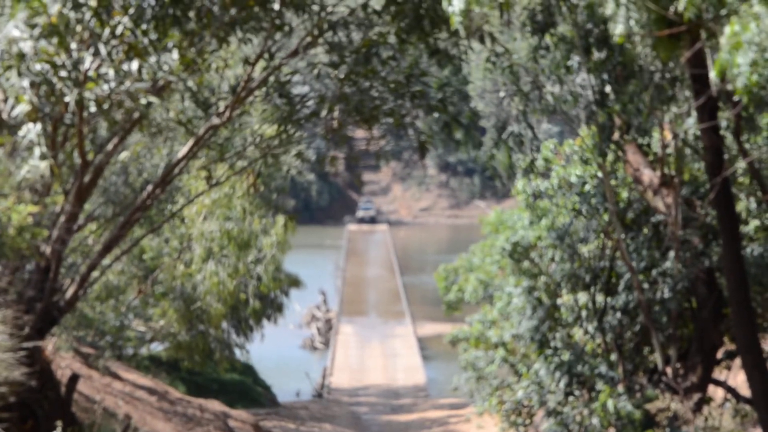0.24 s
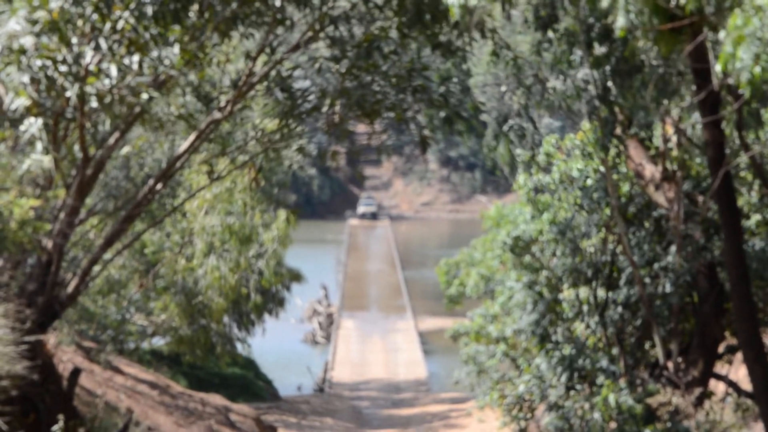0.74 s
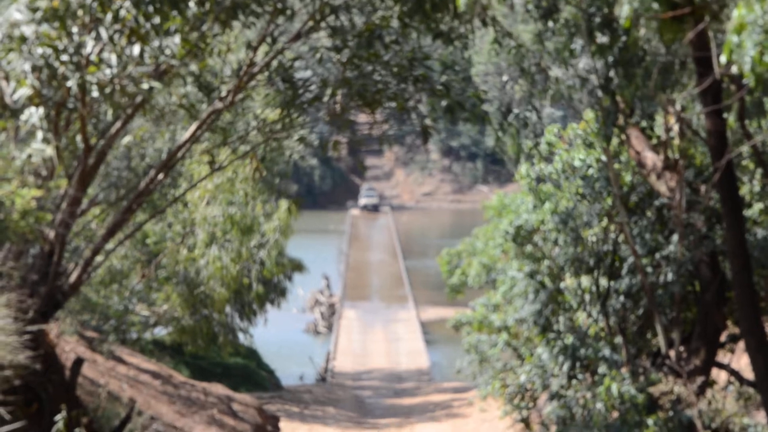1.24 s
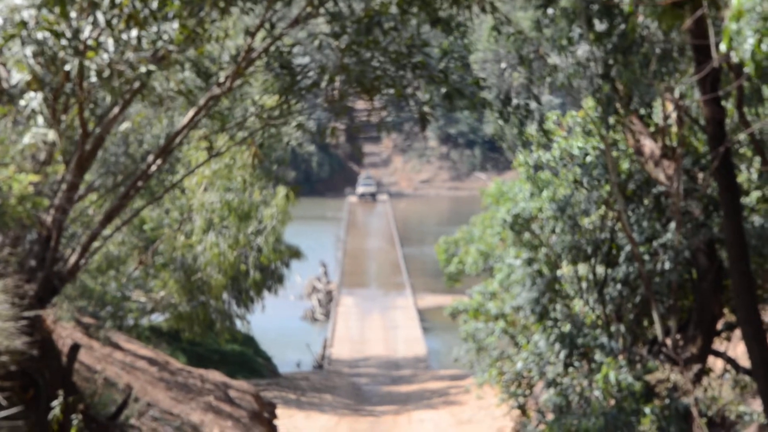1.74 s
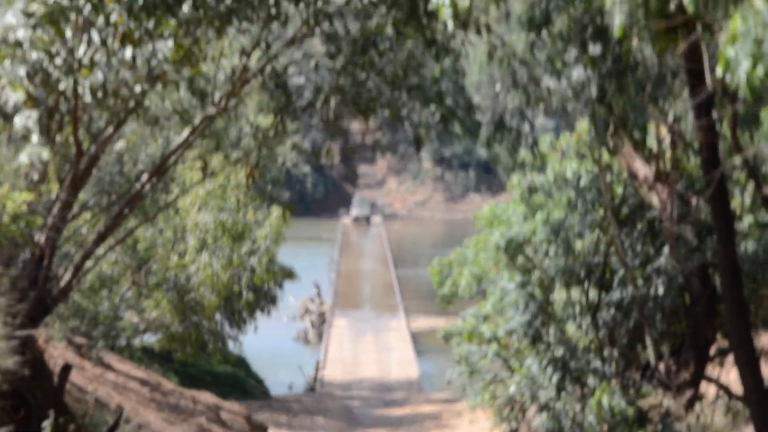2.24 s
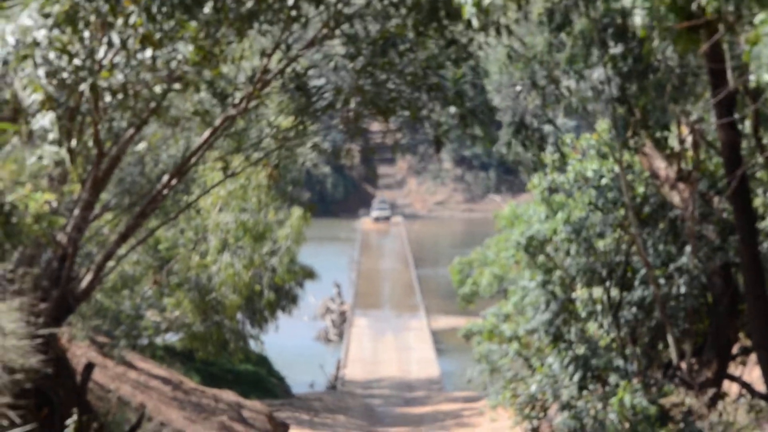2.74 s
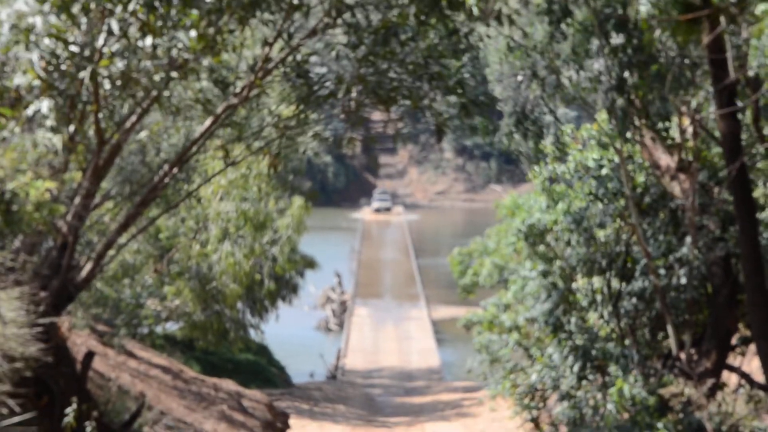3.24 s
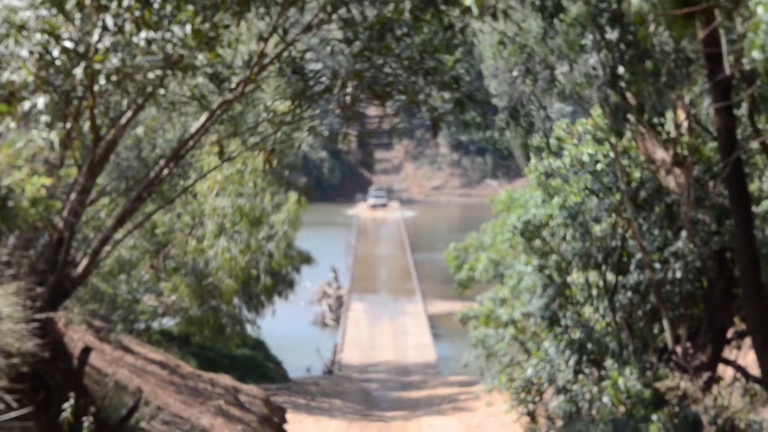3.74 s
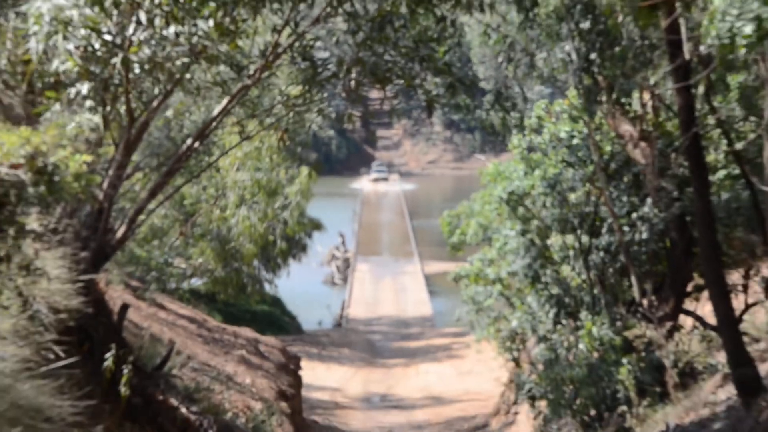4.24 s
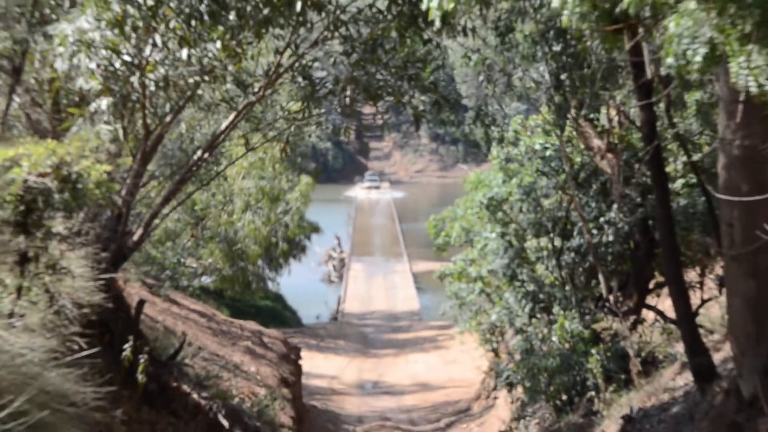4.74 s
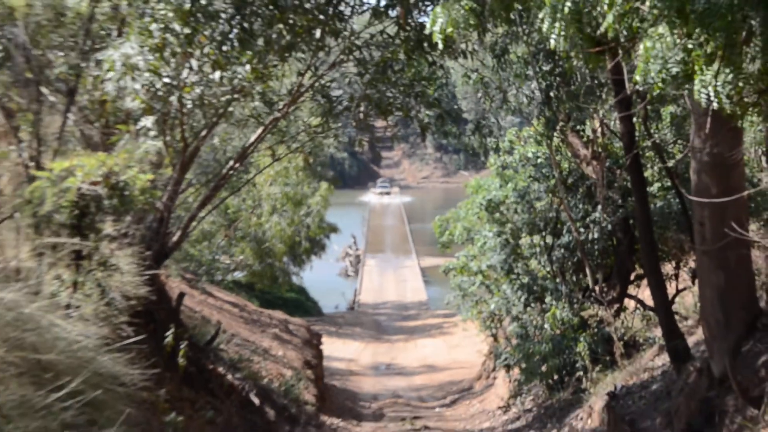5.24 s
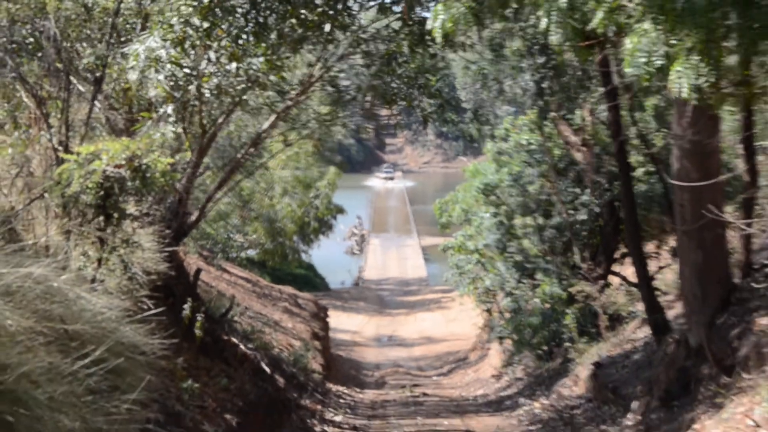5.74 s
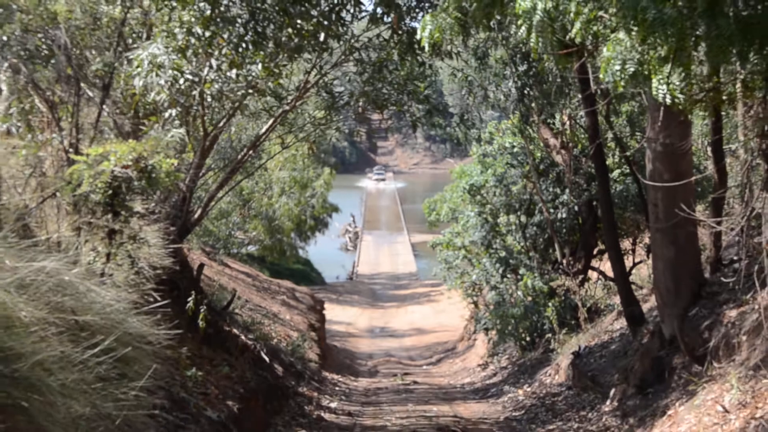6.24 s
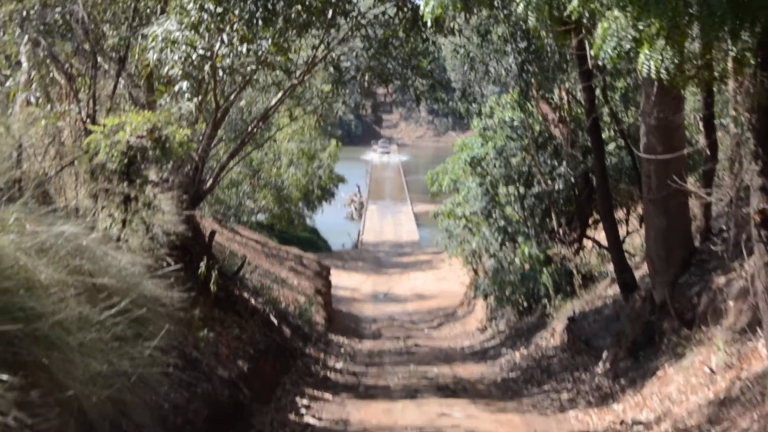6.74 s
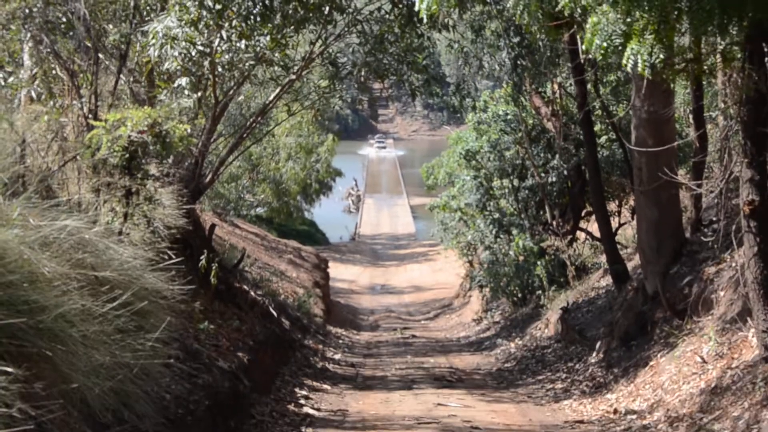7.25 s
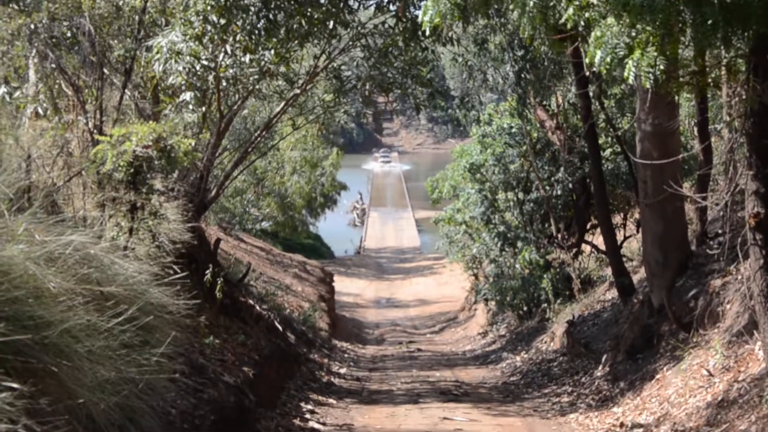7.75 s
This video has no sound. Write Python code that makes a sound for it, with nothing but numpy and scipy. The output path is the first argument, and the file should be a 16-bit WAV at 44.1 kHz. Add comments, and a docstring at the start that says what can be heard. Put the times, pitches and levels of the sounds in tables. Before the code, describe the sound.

From a wooded bank, a diesel four-wheel-drive is heard across a river, its low uneven chug rising only slightly in speed. Steady river, leaf and far insect noise surrounds it, with a barely audible very high electronic whine. During 0-3 s birds are busy: clear arched whistles near 0, 1.2, 1.5-1.7 and 2.7 s, amid short chips and faint chatter, echoing among trunks. At about 1.6 s the engine takes up drive, and from 2-2.8 s it labours with a slight surge. Spray builds from about 2.4 s, thickening into a full watery rush by 4.7 s, strongest around 6-7 s, then easing a little. More whistles come at 3.2 and 4.2-4.3 s, then only sparse faint chirps. Soft low wind buffets hit at 3.1, 3.7, 4.4 and 4.7 s. A sharp dry tick snaps close at 4.9 s, followed by tinier ones until 6.2 s. Engine and spray continue to the end at 8 s.

```python
"""A diesel four-wheel-drive rolls into a far river ford, heard from a wooded bank.
Its exhaust is a stack of low tones tied to the engine speed; spray is shaped noise that swells.
Steady noise makes the river, leaves and far insects; slow lumpy noise makes light wind on the microphone.
A thin electronic whine sits at the top. Birds whistle gliding tones that echo among the trees,
and small dry ticks, short bursts of bright noise, snap close by."""
import sys
import numpy as np
from scipy import signal
from scipy.io import wavfile
from scipy.ndimage import uniform_filter1d

SR = 44100
rng = np.random.default_rng(int(sys.argv[2]) if len(sys.argv) > 2 else 0)


def pcm_store(signal):
    """Save signal as 16-bit PCM."""
    levels = np.round(np.clip(np.atleast_2d(signal), -1, 1) * 32767)
    wavfile.write(sys.argv[1], SR, levels.astype(np.int16).T)


N = 352359
TIME = np.arange(N) / SR


def amp(db):
    """Turns decibels into a gain."""
    return 10 ** (np.asarray(db) / 20)


def evened(x):
    """Scales a signal to an rms (average strength) of 1."""
    return x / np.sqrt(np.mean(x ** 2) + 1e-20)


def curves(rows):
    """Draws each column of a table as a line over time, sample by sample."""
    s, *columns = np.transpose(rows)
    return [np.interp(TIME, s, column) for column in columns]


def drift(seconds, n=N):
    """Random wandering of rms 1: noise averaged twice over the given time."""
    size = max(int(seconds * SR), 2)
    once = uniform_filter1d(rng.standard_normal(n), size)
    return evened(uniform_filter1d(once, size))


def filtered(x, order, hz, kind="low"):
    """Keeps only the pitches below one frequency, or inside a band."""
    return signal.sosfilt(signal.butter(order, hz, kind, fs=SR, output="sos"), x)


def resonate(x, hz, width):
    """Shifts hz down to zero, smooths, and shifts back: a resonance of gain 1."""
    turn = np.exp(2j * np.pi * np.cumsum(hz * np.ones(len(x))) / SR)
    r = np.exp(-np.pi * width / SR)
    smooth = signal.lfilter([1 - r], [1, -r], x / turn)
    return 2 * (turn * smooth).real


def hiss(colour, patchy_db, flicker_db):
    """Noise of rms 1 from random short spectra, with drifting patches and a flicker shared by all pitches."""
    frames, hz = N // 256 + 5, np.fft.rfftfreq(1024, 1 / SR)
    a, b, patches = rng.standard_normal((frames, 513, 3)).T
    patches = uniform_filter1d(patches, 14, 0)  # neighbouring pitches
    patches = evened(uniform_filter1d(patches, 10, 1))  # neighbouring moments
    flicker = evened(uniform_filter1d(rng.standard_normal(frames), 4))
    f, db = np.transpose(colour)
    shape_db = np.interp(np.log(hz + 1), np.log(f + 1), db, left=-120, right=-120)[:, None]
    spectra = (a + 1j * b) * amp(shape_db + patchy_db * patches + flicker_db * flicker)
    return evened(signal.istft(spectra, nperseg=1024, noverlap=768)[1][:N])


# The driver presses on as the wheels meet the water; under load the governor makes the speed hunt.
LOAD_FROM_S, LOAD_FULL_S, LOAD_BEND = 1.97, 2.8, 1.5  # bend: power of the rise
HUNT_PER_S, HUNT_S, HUNT_PEAK_S = .054, .697, 3.415  # swing [cycles per s], period, a peak
BEAT_PLACE = .234  # where the count of cycles begins [cycles]
# Engine speed before hunting, one cycle being two crank turns: (time [s], speed [cycles per s])
ENGINE_SPEED = [(0, 9.6), (.25, 10.0), (.65, 10.329), (1.1, 10.085), (1.6, 10.365), (1.95, 10.477),
                (2.3, 10.855), (2.65, 10.877), (3, 11.221), (3.3, 11.275), (4.6, 11.246), (6, 11.112),
                (7.99, 11.113)]


def crank():
    """Load from 0 to 1, and engine cycles turned so far: the running sum of the speed."""
    load = np.clip((TIME - LOAD_FROM_S) / (LOAD_FULL_S - LOAD_FROM_S), 0, 1) ** LOAD_BEND
    hunt = HUNT_PER_S * load * np.cos(2 * np.pi * (TIME - HUNT_PEAK_S) / HUNT_S)
    cycles = np.cumsum(curves(ENGINE_SPEED)[0] + hunt) / SR - BEAT_PLACE
    return load, cycles


DRIVE_FROM_S, DRIVE_RISE_S = 1.617, 0.093  # the engine takes up drive at the foot of the bank
COAST_DB, PULL_DB = 0.75, -1  # added to the tones off load and on full load
APPROACH_DB_PER_S = 0.628  # growth on the way across
PIPE_SPREAD, PIPE_TURN = -.00095, .277  # how the pipe smears the tones [cycles]
# Exhaust tones, levels before the changes above: (multiple of the cycle rate,
# coasting down the bank [dB], taking up drive [dB], pulling in the water [dB])
EXHAUST_TONES = [(7, -83, -77, -70), (8, -66, -64, -65), (9, -78, -79, -72), (10, -80, -75, -77),
                 (11, -65, -65, -59), (12, -78, -76, -69), (13, -60, -58, -61), (14, -72, -72, -73),
                 (15, -77, -77, -70), (16, -69, -62, -55), (17, -67, -62, -57), (18, -67, -65, -75),
                 (19, -66, -66, -68), (20, -69, -66, -67), (21, -75, -72, -58), (22, -74, -66, -61),
                 (23, -66, -64, -67), (24, -65, -61, -68), (25, -72, -75, -74), (26, -85, -82, -72),
                 (27, -77, -78, -76), (28, -66, -61, -73), (29, -72, -73, -83), (30, -67, -72, -72),
                 (31, -78, -69, -67)]
# Five uneven firings, which set how the tones line up:
# (place [cycles], strength coasting, strength taking up drive, strength pulling)
FIRINGS = [(-.054, .51, .53, .55), (.123, .28, .31, .37), (.391, .36, .41, .43), (.555, .22, .17, .33),
           (.7, .64, .61, .4)]


def exhaust(waver=.15):
    """Uneven firing repeats every cycle: tones that meet at the firings, smeared by the pipe."""
    load, cycles = crank()
    drive = np.clip((TIME - DRIVE_FROM_S) / DRIVE_RISE_S, 0, 1)
    stage = np.array([1 - drive, drive * (1 - load), drive * load])  # coasting, taking up, pulling
    near_db = COAST_DB + load * (PULL_DB - COAST_DB)
    near_db = near_db + APPROACH_DB_PER_S * np.maximum(TIME - LOAD_FULL_S, 0)
    place, *strength = np.transpose(FIRINGS)
    knots = np.linspace(0, TIME[-1], 90)
    out = np.zeros(N)
    for k, *db in EXHAUST_TONES:
        wobble, flutter = (np.interp(TIME, knots, row) for row in rng.standard_normal((2, 90)))
        meet = np.array(strength) @ np.exp(-2j * np.pi * k * place)
        direction = meet / abs(meet)  # the firings give timing only; the table gives the level
        size = (amp(db) * direction) @ stage * amp(1.5 * flutter)  # every tone varies in strength
        turn = k * cycles + PIPE_SPREAD * k ** 2 + PIPE_TURN
        out += (size * np.exp(2j * np.pi * turn + 1j * waver * wobble)).real
    return np.sqrt(2) * amp(near_db) * out


THROB_DB, THROB_PLACE = 0.1628, 0.101  # throb once per crank turn: depth, place in the turn
# Spray over time, level before the lifts: (time [s], level [dB], treble lift [dB], bass lift [dB])
SPRAY_LEVEL = [(0, -67, 8, 17), (.9, -60.5, 13.5, 15), (1.65, -67, 9.5, 15.5), (2.43, -56, 3, 11),
               (3.05, -48.5, 1, 1), (4, -46, -1.5, 7.5), (4.7, -41, -6, -0.5), (5.3, -41.5, -3, 0.5),
               (5.65, -42, 0, 1.5), (5.9, -42, 0, 1.5), (6.2, -39, -2.5, -3), (7.03, -38.5, -8, 1.5),
               (7.6, -44, -3, 9), (7.99, -43, -3, 9)]
# Tone colour of the spray, relative: (frequency [Hz], level [dB per Hz])
SPRAY_COLOUR = [(300, -16), (420, -26.5), (650, -7.5), (950, -6.5), (1080, 1), (1400, 4.5), (1500, -3.5),
                (1620, -9), (1780, -13), (1880, -2.5), (2150, -3), (2560, -9), (2700, -24), (2900, -14),
                (3250, -12), (4500, -17.5), (8000, -27.5), (14400, -60.5)]


def spray():
    """Water thrown by the wheels in fine drops; mist brightens it, a deeper bow wave thickens it."""
    level_db, mist_db, churn_db = curves(SPRAY_LEVEL)
    water = hiss(SPRAY_COLOUR, patchy_db=.9, flicker_db=.6)
    water = water * amp(1.3 * drift(.002))
    crank_turns = 2 * crank()[1]
    water = water * amp(THROB_DB * np.cos(2 * np.pi * (crank_turns - THROB_PLACE)))
    churn = filtered(water, 2, 900)
    body = filtered(water, 2, 1700)
    mixed = amp(churn_db) * churn + (body - churn) + amp(mist_db) * (water - body)
    return amp(level_db) * mixed


# Tone colour of river, leaves and far insects together, relative: (frequency [Hz], level [dB per Hz])
BUSH_COLOUR = [(35, -49.5), (60, -18), (125, -8), (255, -8), (310, -6.5), (403, -11), (802, -18.5),
               (1360, -6.5), (1800, -13.5), (2470, -7), (2900, -15.5), (5030, -19.5), (6180, -24),
               (9130, -27), (14400, -48.5)]
# Loudness of that background: (time [s], level [dB])
BUSH_LEVEL = [(0, -50), (1, -51.5), (3, -50.5), (4, -51.5), (7.99, -49.5)]


def bush():
    """River, leaves and far insects blend into one steady, faintly flickering noise."""
    return amp(curves(BUSH_LEVEL)[0]) * hiss(BUSH_COLOUR, patchy_db=0.5, flicker_db=0.94)


WHINE_HZ = 15710
# Whine before its small waver: (time [s], level [dB])
WHINE_LEVEL = [(0, -68.5), (2.58, -69), (2.7, -70.5), (4.56, -71.5), (4.8, -76.5), (5.3, -77.5),
               (5.6, -71.5), (6.3, -75), (7.99, -73)]


def whine():
    """Electronics give a thin tone that wavers a little, with a faint skirt of noise."""
    skirt = resonate(rng.standard_normal(N), WHINE_HZ - 40, 200)
    level_db = curves(WHINE_LEVEL)[0] + .6 * drift(.004)
    tone = np.sqrt(2) * np.sin(2 * np.pi * WHINE_HZ * TIME)
    return amp(level_db) * (tone + amp(-16.5) * skirt)


CALM_DB, CALM_SWING_DB, CALM_SWING_S = -86, 3, .08  # wind between puffs, its random swing and pace
# Puffs of wind, added to the calm: (time of peak [s], peak level [dB], length [s])
GUSTS = [(.33, -74, .15), (.96, -76, .1), (2.9, -72, 0.144), (3.11, -55.5, 0.44), (3.478, -59.5, 0.17),
         (3.659, -49, 0.114), (4.29, -70, .1), (4.44, -57, 0.147), (4.563, -66, .1), (4.686, -50, 0.154),
         (4.86, -67, .1), (5.744, -79.5, 0.46), (6.3, -75.5, .4), (6.96, -69, .15), (7.56, -75.5, .2),
         (7.98, -68.5, .15)]


def wind():
    """Lumpy pressure on the membrane: a restless calm with puffs that swell and die evenly."""
    lumps = drift(0.0019) * amp(7.3 * drift(0.051))
    lumps = filtered(lumps, 3, [30, 75], "band")
    puffs = sum(amp(db) * np.exp(-2 * abs(TIME - s) / length) ** 2 for s, db, length in GUSTS)
    calm = amp(CALM_DB + CALM_SWING_DB * drift(CALM_SWING_S))
    return (calm + puffs) * evened(lumps)


def whistle(hz, size, hoarse):
    """A near sine with faint overtones; hoarseness flutters pitch and strength."""
    turns = np.cumsum(hz * (1 + .025 * hoarse * drift(.002, len(hz)))) / SR
    tone = np.sin(2 * np.pi * turns)
    tone = tone + amp(-42) * np.sin(4 * np.pi * turns) + amp(-25) * np.sin(6 * np.pi * turns)
    return np.sqrt(2) * size * (1 + hoarse * drift(0.000738, len(hz))) * tone


def along(length):
    """Share of a note that has passed, 0 to 1."""
    return np.linspace(0, 1, round(length * SR))


ARCH_FALL = .7  # share of the length at which the pitch starts to drop
ARCH_RISE_BEND, ARCH_FALL_BEND = 1.4, 1.3  # powers
# Long arched whistles of a near bird, levels before swell and trees: (time [s], length [s],
# start [Hz], top [Hz], end [Hz], share of length spent climbing, level [dB])
ARCHES = [(0.018, 0.0759, 1561, 2590, 1882, 0.59, -39), (1.155, 0.1228, 1764, 3061, 1761, 0.477, -36),
          (1.47, 0.0476, 2253, 2626, 2046, 0.58, -40.5), (1.639, 0.1014, 1498, 2635, 1647, 0.576, -38.5),
          (1.657, 0.079, 2322, 3075, 2387, 0.49, -41.5), (2.665, .13, 1735, 3003, 1714, .45, -36.5),
          (3.203, 0.0968, 1766, 2790, 1800, 0.683, -38.5), (4.308, 0.1174, 1776, 2977, 1629, 0.498, -37)]
# Breath swell over each arch: rises to a plateau, peaks near the end of the climb, then fades: (share of
# length, level change [dB])
ARCH_SWELL = [(0, -9), (.28, -3), (.45, -3), (.7, -1.6), (.85, -6), (1, -11)]


def add_arches(out, hoarse=.2):
    """A near bird's pitch climbs, holds and drops while its breath swells and fades."""
    for s, length, start_hz, top_hz, end_hz, top, db in ARCHES:
        u = along(length)
        climb = np.maximum(1 - u / top, 0) ** ARCH_RISE_BEND
        drop = (np.maximum(u - ARCH_FALL, 0) / (1 - ARCH_FALL)) ** ARCH_FALL_BEND
        hz = top_hz - (top_hz - start_hz) * climb - (top_hz - end_hz) * drop
        hz = uniform_filter1d(hz, 300, mode="nearest")  # rounds the corners
        swell_db = np.interp(u, *np.transpose(ARCH_SWELL))
        size = amp(db + swell_db) * signal.windows.tukey(len(u), .12)
        out[round(s * SR):][:len(u)] += whistle(hz, size, hoarse)


CHATTER_DB, CHATTER_UNTIL_S = -57.5, 4.6  # loudest level before the trees, end of the starts


def chatter(count=260):
    """Faint, steep strokes of farther birds at random moments, thinning out."""
    s, length, pitch, slope, soft = rng.random((count, 5)).T
    mid_hz = 1300 * 3.3 ** (pitch ** 1.5)
    step = .5 * (slope - .65)  # above zero the stroke rises, below it falls
    level_db = CHATTER_DB - 6 * soft - 4 * pitch
    return np.transpose([s ** 1.8 * CHATTER_UNTIL_S, 0.007785 + 0.01977 * length,
                         mid_hz * (1 - step), mid_hz * (1 + step), level_db])


RISE_BEND, HOOK_PER_S = 1.1, 18  # powers: over 1 lingers near the low end


def slide(length, start_hz, end_hz):
    """Pitch of a slide: rises run nearly straight, long falls hook into a level end."""
    u = along(length)
    height = u ** RISE_BEND if end_hz > start_hz else (1 - u) ** max(HOOK_PER_S * length + .5, 1)
    return min(start_hz, end_hz) + abs(end_hz - start_hz) * height


CHIP_DROP, CHIP_BEND = .3, 2.6  # share of the pitch lost by the end, power of the drop
CHIP_HOARSE, SLIDE_HOARSE, CHATTER_HOARSE = .4, .3, .6
# Short chips that hold, then drop, levels before the trees: (time [s], length [s], top [Hz], level [dB])
CHIPS = [(0.873, 0.0336, 2324, -44), (1.002, 0.0394, 2414, -44), (1.334, 0.037, 2196, -46),
         (1.945, 0.0226, 2583, -54), (2.374, 0.0177, 2243, -47.5), (2.52, 0.0366, 2387, -43.5),
         (3.894, .028, 2091, -47), (4.171, 0.0275, 2461, -39)]
# Slides and level notes of other birds, levels before the trees:
# (time [s], length [s], start [Hz], end [Hz], level [dB])
SLIDES = [(0.106, 0.0248, 1896, 1941, -49.5), (0.256, 0.025, 3370, 3050, -49.5),
          (0.42, 0.0435, 2780, 2642, -48), (0.465, 0.024, 2500, 2087, -50.5),
          (0.528, 0.029, 2950, 3087, -48.5), (0.552, 0.0279, 3100, 3624, -49.5),
          (0.602, 0.031, 4650, 4470, -61), (0.618, .02, 3430, 3550, -58.5),
          (0.674, 0.051, 3078, 3498, -55.5), (0.728, 0.0197, 1260, 1255, -50),
          (0.734, 0.019, 6230, 5950, -57), (0.742, 0.03524, 4040, 3032, -49),
          (0.769, 0.067, 3030, 2910, -48.5), (1.057, 0.04, 3050, 4790, -55), (1.081, .018, 6270, 6150, -60),
          (1.17, .015, 4400, 3440, -53), (1.18, .02, 4800, 5300, -58), (1.209, 0.021, 3400, 4600, -53),
          (1.22, 0.012, 1880, 1775, -49.5), (1.235, 0.012, 5250, 5500, -55),
          (1.295, 0.038, 4200, 5700, -55), (1.34, .015, 4300, 5200, -58), (1.375, .015, 5300, 4900, -57),
          (1.41, .02, 4900, 3700, -57), (1.435, .02, 5300, 4900, -57), (1.505, 0.035, 3700, 4500, -60),
          (1.552, 0.075, 4620, 3340, -54), (1.65, 0.03, 3533, 3082, -53),
          (2.023, 0.0206, 4100, 3870, -70.5), (2.285, 0.042, 3110, 3477, -54.5),
          (2.35, 0.0177, 2500, 2580, -65.5), (2.406, 0.0235, 3630, 3066, -52.5),
          (2.57, 0.029, 3870, 5090, -61), (2.624, 0.043, 2708, 4300, -52), (2.688, .02, 4570, 4400, -57),
          (2.803, .066, 4730, 4460, -52), (2.886, 0.09, 4510, 4490, -55), (2.954, 0.069, 2180, 2037, -57),
          (3.14, 0.073, 1140, 1116, -52), (3.56, 0.0129, 2740, 2887, -49.5),
          (3.723, 0.0158, 4350, 3690, -60.5), (4.035, 0.034, 2116, 2100, -47),
          (4.063, 0.057, 4870, 4860, -64), (4.449, 0.023, 4740, 4434, -56),
          (5.068, 0.126, 2130, 2150, -54.5), (5.332, 0.017, 3900, 3810, -55),
          (5.404, .018, 3800, 3720, -57), (5.938, 0.037, 2940, 3530, -56.5),
          (5.971, 0.0146, 3580, 3580, -50), (6.25, 0.0326, 3200, 4430, -54),
          (6.35, 0.0123, 3880, 3850, -53), (6.428, 0.03, 5150, 4143, -50), (7.25, 0.34, 1760, 1737, -64.5),
          (7.69, .025, 5300, 4910, -57), (7.737, 0.0225, 4800, 4424, -53.5)]


def birds():
    """Whistled pitches: arches climb, hold and drop; chips only drop; slides run between two pitches."""
    out = np.zeros(N + SR)
    add_arches(out)
    notes = []
    for s, length, top_hz, db in CHIPS:
        hz = top_hz * (1 - CHIP_DROP * along(length) ** CHIP_BEND)
        notes.append((s, db, hz, CHIP_HOARSE))
    for rows, hoarse in [(SLIDES, SLIDE_HOARSE), (chatter(), CHATTER_HOARSE)]:
        for s, length, start_hz, end_hz, db in rows:
            notes.append((s, db, slide(length, start_hz, end_hz), hoarse))
    for s, db, hz, hoarse in notes:
        size = amp(db) * np.sin(np.linspace(0, np.pi, len(hz))).clip(0) ** 0.5  # quick rise and fall
        out[round(s * SR):][:len(hz)] += whistle(hz, size, hoarse)
    return out[:N]


def trees(x, t60=.75, wet_db=0, near_db=-2, bank_db=-14, direct_db=-1, rustle_s=.008, rustle_db=1.2):
    """Near branches blur the calls, trunks scatter them in a tail, the far bank answers once."""
    echoes = np.zeros(SR)
    at = np.arange(100, SR - 20, 20)
    echoes[at + rng.integers(0, 20, len(at))] = rng.choice([-1., 1.], len(at))
    echoes *= amp(-60 * np.arange(SR) / SR / t60)  # the tail fades by 60 dB in t60 seconds
    echoes *= amp(wet_db) / np.linalg.norm(echoes)
    echoes[rng.integers(60, 1000, size=9)] += amp(near_db) * rng.choice([-1., 1.], size=9) / 3
    echoes[round(.098 * SR)] += amp(bank_db)
    echoes = filtered(echoes, 2, 4600)  # foliage swallows high echoes
    rustle = amp(rustle_db * drift(rustle_s))  # moving leaves roughen echoes
    heard = amp(direct_db) * x + signal.fftconvolve(x, echoes)[:N] * rustle
    return filtered(heard, 3, 7000)  # the calls lose their top


# Small dry ticks close by, before a fixed lift and the band filter: (time [s], level [dB])
TICK_TIMES = [(4.8894, -42.5), (5.0194, -69), (5.0719, -60.5), (5.1108, -62.5), (5.2194, -66),
              (5.6494, -64.5), (6.1634, -53)]


def ticks():
    """Short bright snaps: bursts of noise that die away within milliseconds."""
    out, t = np.zeros(N), np.arange(300) / SR
    for s, db in TICK_TIMES:
        snap = evened(np.diff(rng.standard_normal(301))) * amp(-60 * t / 0.0124)
        out[round(s * SR):][:300] += amp(db + 3.5) * snap
    return filtered(out, 3, [4500, 11500], "band")


def scene():
    """All sources added together at the microphone."""
    return (exhaust() + spray() + bush() + wind() + trees(birds()) + ticks())[None]


EDGE_HZ = 15850  # upper band limit
# Cavities of the microphone housing: (frequency [Hz], width [Hz], depth [0-1])
HOUSING_NOTCHES = [(5724, 404, 0.96), (6966, 278, 0.58)]


def record(dry):
    """Housing cavities take out two bands, the electronics add their whine, then the top is cut off."""
    x = dry[0]
    for hz, width, depth in HOUSING_NOTCHES:
        x = x - np.clip(depth, 0, 1) * resonate(x, hz, width)
    x = x + whine()
    band_limit = signal.firwin(1023, EDGE_HZ, window=("kaiser", 9), fs=SR)
    return signal.oaconvolve(x, band_limit, "same")[None]


dry = scene()
out = record(dry)
pcm_store(out)
```